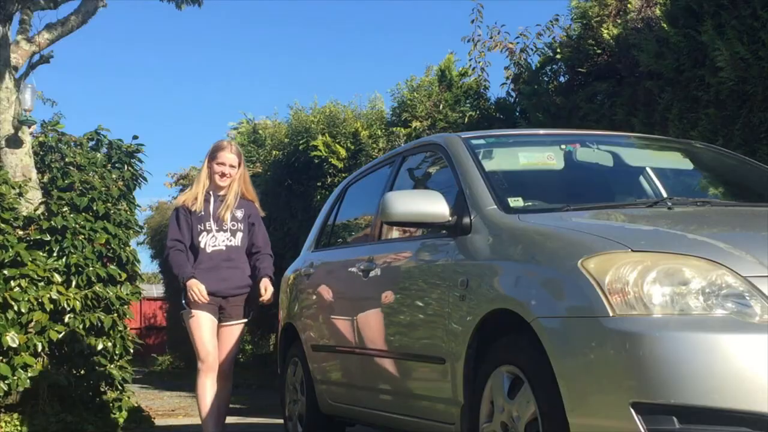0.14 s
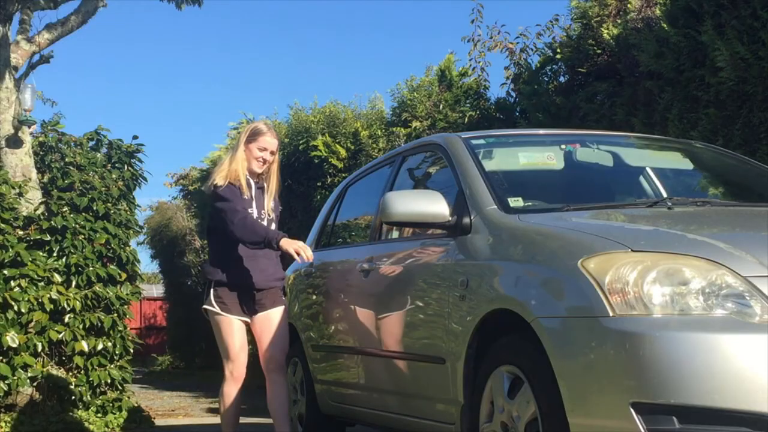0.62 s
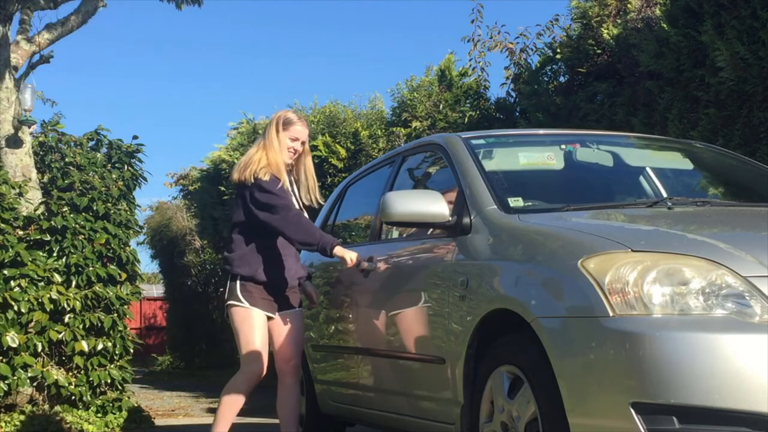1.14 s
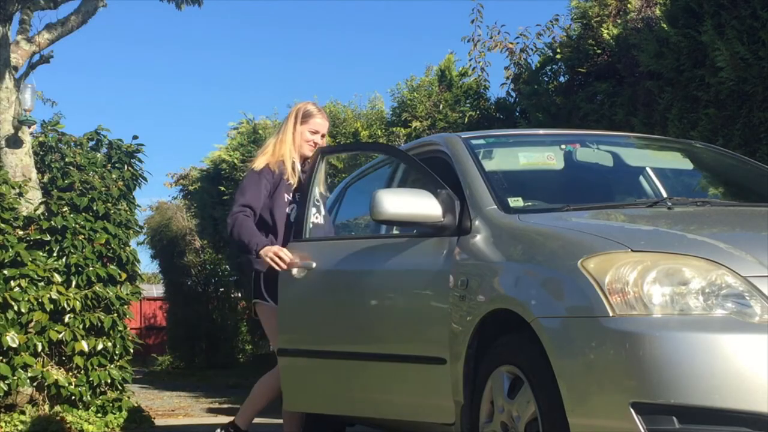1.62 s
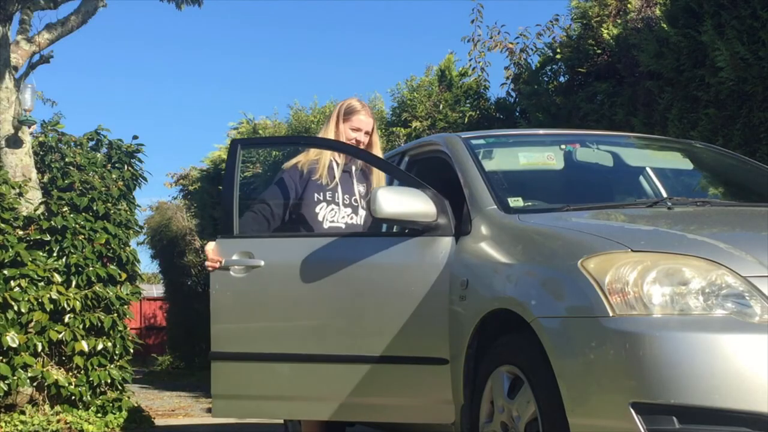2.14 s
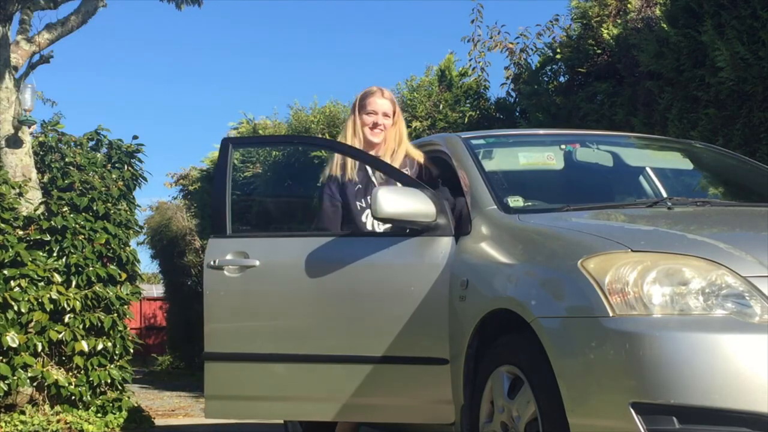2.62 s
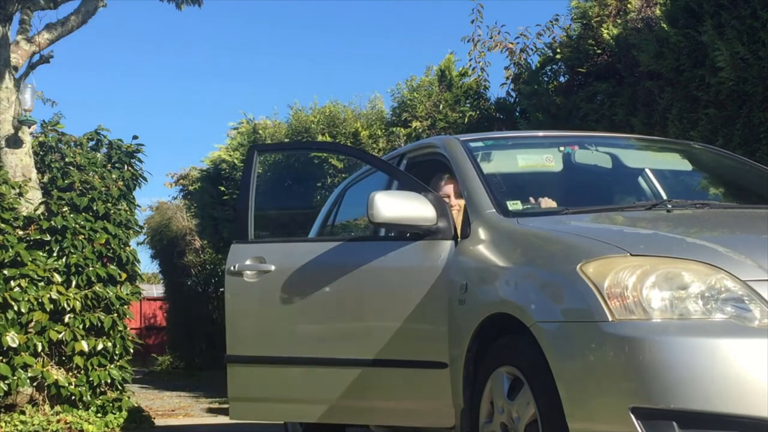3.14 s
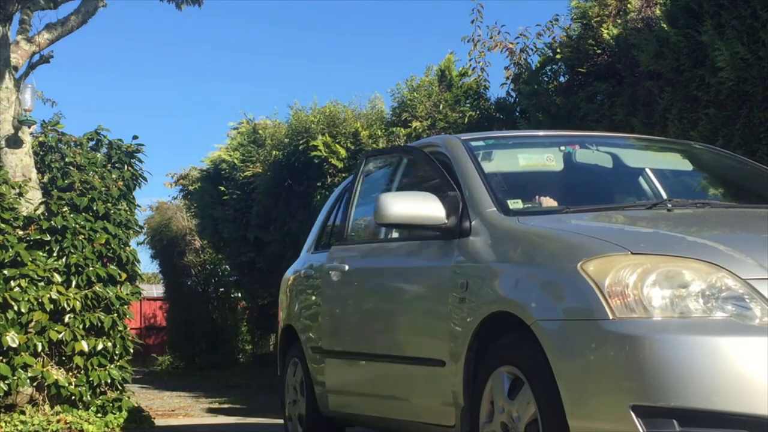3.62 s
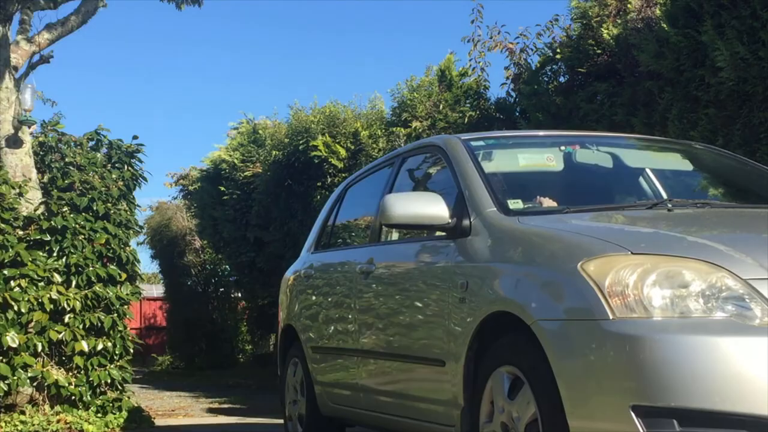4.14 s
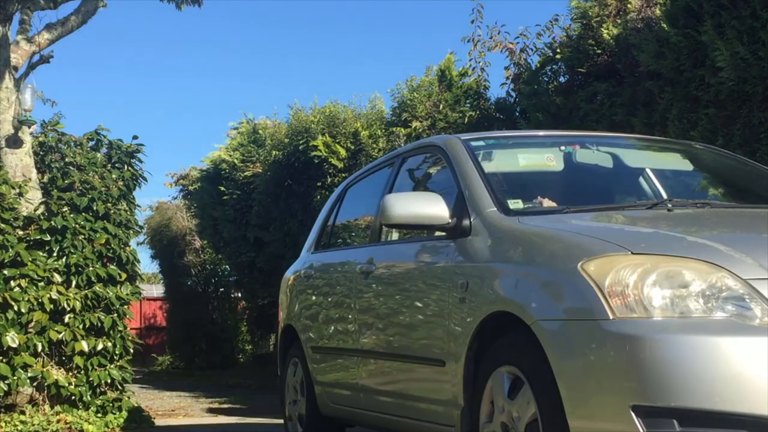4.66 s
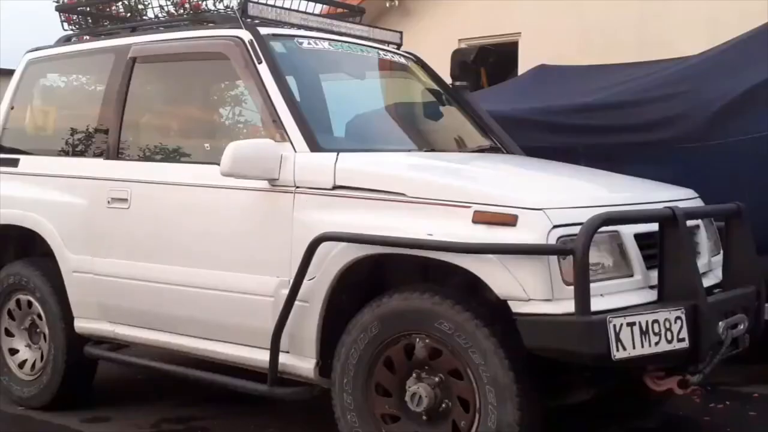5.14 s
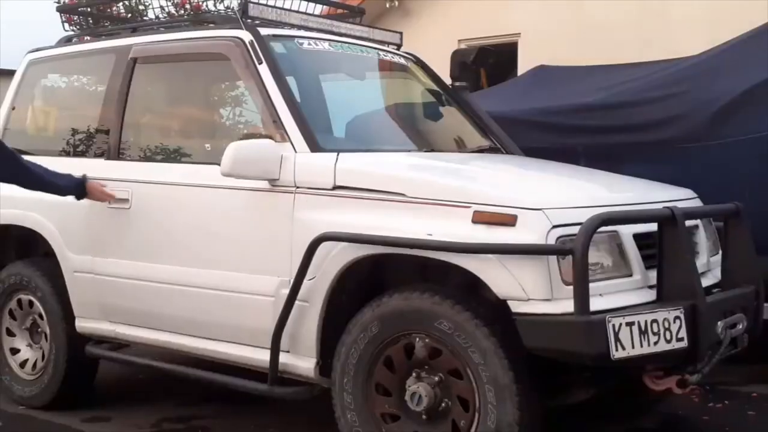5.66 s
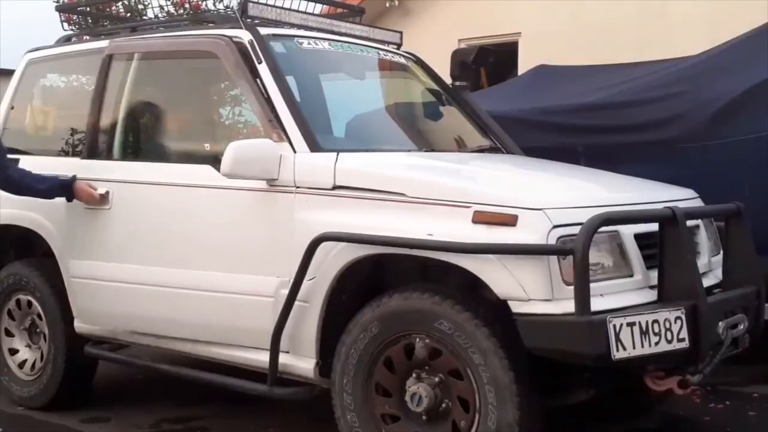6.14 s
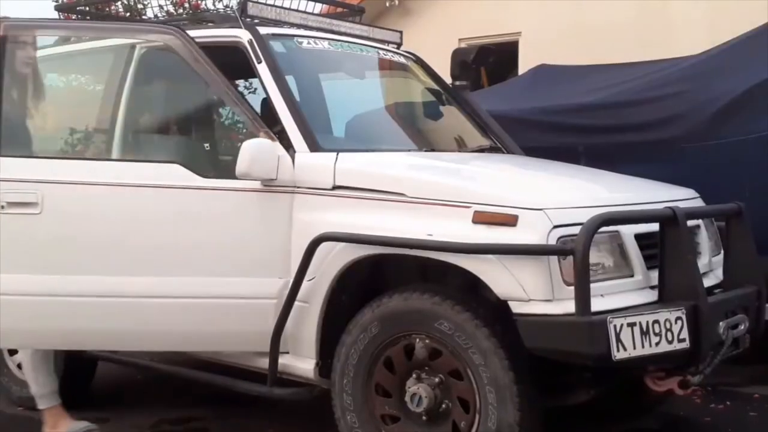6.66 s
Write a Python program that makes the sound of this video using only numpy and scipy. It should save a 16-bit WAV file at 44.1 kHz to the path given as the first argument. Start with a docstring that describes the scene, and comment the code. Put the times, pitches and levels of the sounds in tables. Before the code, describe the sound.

A car slam fades, then a hatchback door unlatches, groans open and slams; after a cut, an off-road car's handle is worked until its latch snaps open.

```python
"""A hedged drive, then a yard, with a short silence between. In the drive, alike in both channels, a slam dies away,
then a hatchback door is unlatched, swings with a groan and is slammed; far traffic, low gusts and a bird surround it.
In the yard, in stereo, feet scuff and a hand works an off-road car's handle until its latch springs open, over a hum.
Doors are bursts of noise and fading sines shaped per blow; groan, bird and hum are sines; the rest is shaped noise."""
import sys
import numpy as np
from scipy import signal
from scipy.fft import rfft, irfft, next_fast_len
from scipy.io import wavfile
from scipy.ndimage import uniform_filter1d

SR = 44100
rng = np.random.default_rng(int(sys.argv[2]) if len(sys.argv) > 2 else 0)


def log_audio(samples):
    """Write samples as a 16-bit WAV file to the path given in sys.argv[1]."""
    # one column per channel
    frames = np.atleast_2d(samples).T
    # limit to full scale, then quantise
    limited = np.clip(frames, -1, 1)
    pcm = np.round(limited * 32767).astype(np.int16)
    wavfile.write(sys.argv[1], SR, pcm)


def volts_from_db(level):
    """Convert decibel levels to linear amplitude ratios."""
    exponent = np.asarray(level, float) / 20
    return 10 ** exponent


N = 298821
T = np.arange(N) / SR


def unit(x):
    """Scale to rms 1."""
    return x / np.sqrt(np.mean(x ** 2))


def peak_to(x, db):
    """Scale so that the loudest 10 ms reach db."""
    return x * volts_from_db(db) / np.sqrt(uniform_filter1d(x ** 2, size=441).max() + 1e-30)


def curve(rows, col=1, off=None):
    """Read one column of a table along time; off is the value outside it."""
    rows = np.asarray(rows)
    return np.interp(T, rows[:, 0], rows[:, col], off, off)


def colour(x, points):
    """Make some pitches louder than others, following (frequency [Hz], level [dB]) points."""
    hz, db = np.transpose(points)
    n = next_fast_len(len(x), True)
    f = np.arange(n // 2 + 1) * SR / n + 1
    gain = volts_from_db(np.interp(np.log(f), np.log(hz), db))
    return irfft(rfft(x, n) * gain, n)[:len(x)]


def lumpy(x):
    """Give a noise chance peaks and valleys every 45 Hz, as small modes crowd and thin out."""
    hz = np.arange(45, SR / 2, 45)
    return colour(x, np.c_[hz, 4 * rng.standard_normal(len(hz))])


def walk(rate):
    """Wander at random: levels held 1 / rate s, smoothed twice; spread near 1."""
    k = int(SR / rate)
    steps = np.repeat(rng.standard_normal(N // k + 1), k)
    return 1.32 * uniform_filter1d(uniform_filter1d(steps, k), k)[:N]


def tone(rows, wobble):
    """A near sine along (time [s], frequency [Hz], level [dB]) rows, silent outside them."""
    hz = curve(rows) * (1 + wobble * walk(150))
    gain = uniform_filter1d(volts_from_db(curve(rows, col=2, off=-140)), size=200)
    return np.sqrt(2) * gain * np.sin(2 * np.pi * np.cumsum(hz) / SR)


def scatter(x, db, fade):
    """Hedges and walls add a dense spray of reflections that fades quickly."""
    t = T[:SR // 4]
    spray = rng.standard_normal(len(t)) * np.exp(-t / fade) * (1 - np.exp(-t / .004))
    return x + volts_from_db(db) * signal.fftconvolve(x, spray)[:N]


# limits of the four parts of a door: low and high [Hz] in turn for latch, cabin, panel, tick
PART_LIMITS = [600, 2200, 30, 160, 160, 600, 2200, 15500]


def strike(blows, modes, points, parts, rough_db):
    """Each blow cracks, then rattles on in latch, cabin, panel and trim: strong modes over countless small ones."""
    t, out = T[:int(.6 * SR)], np.zeros((4, N + SR))
    for k, (lo, hi) in enumerate(np.reshape(PART_LIMITS, (4, 2))):
        rise, crack, tail_db, share, modes_db = parts[k]
        onset = 1 - np.exp(-t / rise)
        band = signal.butter(3, [lo, hi], "band", fs=SR, output="sos")
        noise = lumpy(colour(rng.standard_normal(N), points))
        small = np.r_[signal.sosfilt(band, noise), np.zeros(SR)]
        rattle = np.r_[volts_from_db(rough_db * walk(150)), np.zeros(SR)]  # loose parts touch unevenly
        own = [m for m in modes if lo <= m[0] < hi]
        for s, *db, t60 in blows:
            span = slice(int(s * SR), int(s * SR) + len(t))
            tail = volts_from_db(tail_db - 60 * t / max(share * t60, .01))
            shape = onset * (np.exp(-t / crack) + tail) * rattle[span]
            ring = peak_to(small[span] * shape, 0)
            if own:
                hz, g, mode_t60 = np.transpose(own)[:, :, None]
                # seals and hands damp the ring
                fade = 60 * t / np.minimum(np.clip(mode_t60, .01, 1), 1.02 * t60)
                # each blow lands elsewhere, so loudness and pitch differ a little
                spot, drift, start = rng.standard_normal((3, len(own), 1))
                # one push sets off all modes nearly together
                waves = np.sin(2 * np.pi * (hz * (1 + 0.0197 * drift) * t + 0.13 * start))
                strong = np.sum(volts_from_db(g + 1.3 * spot - fade) * waves, axis=0)
                ring = ring + peak_to(strong * onset, modes_db)
            out[k, span] += peak_to(ring, db[k])
        if lo > 100:  # the cabin answers at once, the rest stays in its range
            out[k] = signal.sosfilt(band, out[k])
    return out[:, :N]


def clacks(rows, cycles):
    """A small steel part rings briefly at each contact, fading by 60 dB in a number of cycles."""
    out, t = np.zeros(N), T[:SR // 3]
    for s, db, hz in rows:
        ring = (1 - np.exp(-t / 0.00084)) * volts_from_db(-60 * t * hz / cycles) * np.sin(2 * np.pi * hz * t)
        out[int(s * SR):int(s * SR) + len(t)] += volts_from_db(db) * ring / np.abs(ring).max()
    return out


def burst(s, db, t60, hz):
    """A sudden bright hiss, strongest from hz upwards, that dies fast."""
    hiss = colour(rng.standard_normal(N), [(hz / 2, -30), (hz, 0), (16000, -18)])
    return unit(hiss) * volts_from_db(db - 60 * np.abs(T - s) / t60) * (T > s)


# window glass and trim shiver on after the slam, one list each: (time [s], frequency [Hz], level [dB])
SHIVER_NOTES = [
    [(3.97, 555, -53), (4.08, 562, -55.5), (4.16, 552, -53.5), (4.24, 547, -65)],
    [(4.03, 1800, -63), (4.1, 1800, -62.5), (4.17, 1810, -68), (4.21, 1814, -79)],
]


def shiver():
    """Loose panes buzz unevenly near their own pitch."""
    return sum(tone(rows, 0.03) * volts_from_db(3.2 * walk(70)) for rows in SHIVER_NOTES)


# pushes on the hinge: (start [s], length [s], frequency [Hz], level [dB])
HINGE_GROANS = [(2.243, .16, 196, -55.5), (2.421, 0.15, 195.6, -60.5)]


def groan():
    """The hinge hums on each push, swelling for 40 ms, then sagging in pitch and fading."""
    out = 0
    for s, length, hz, db in HINGE_GROANS:
        rows = [(s, hz, db - 9.0), (s + .04, hz, db), (s + length, hz - 5.56, db - 11)]
        out = out + tone(rows, 0.014)
    return out


# blows on the hatchback: (time [s], latch level [dB], cabin thump level [dB], door panel level [dB],
# tick level [dB], ring t60 [s])
HATCH_HITS = [(0.626, -80, -61, -65, -82, 0.15), (0.925, -77, -59, -83, -86, 0.44),
              (1.151, -48, -63, -43, -71, 0.24), (1.164, -43, -70, -37, -56, 0.12),
              (1.177, -49, -63, -48, -72, 0.16), (1.196, -45.5, -67, -42, -65, 0.17),
              (1.217, -50, -47, -49, -65, 0.47), (1.240, -55, -32.5, -30.5, -68, 0.14),
              (1.252, -41, -41, -38, -67, 0.26), (1.266, -52, -53, -49, -64, 0.24),
              (1.280, -44, -39, -42, -70, 0.33), (1.323, -49.5, -64, -45.5, -71, 0.38),
              (1.368, -59, -66, -60, -75, 0.24), (1.552, -72, -68.5, -45.5, -80, 0.64),
              (1.577, -59, -65, -49, -76, 0.73), (1.597, -56, -67, -54, -66, 0.37),
              (1.615, -41, -50, -32.5, -58, 0.11), (1.632, -53, -49, -36.5, -68, 0.3),
              (1.705, -47.5, -66, -52, -62, 0.21), (1.738, -70, -65, -59.5, -79, 0.21),
              (1.795, -77, -56, -55.5, -90, 0.69), (2.081, -66, -45.5, -79, -84, 0.88),
              (2.793, -81, -53, -73, -90, 0.51), (2.941, -61, -54.5, -59, -63, 1),
              (3.279, -33.5, -60, -30.5, -52.5, 0.3), (3.289, -44, -38.5, -39, -48.5, 0.57),
              (3.878, -36.5, -53.5, -33, -52.5, 0.71), (3.895, -49, -58, -49.5, -52, 0.13),
              (3.900, -27.5, -23.5, -22.5, -41.5, 0.12), (3.917, -29.5, -27.5, -38.5, -48, 0.14),
              (3.939, -46, -35.5, -31, -52, 0.56), (3.96, -48.5, -33, -55, -59, 0.69),
              (4.03, -48.5, -39, -44, -67, 0.52), (4.117, -55, -68, -47.5, -69.5, 1),
              (4.514, -64, -62, -77, -58, 0.092)]
# strong modes of its body: (frequency [Hz], level [dB], t60 [s])
HATCH_RINGS = [(56.8, -2.5, 0.23), (86.7, 2.5, 0.091), (141.5, -1.5, 0.73), (182.5, -3, 0.28),
               (241, -3.5, 0.45), (285.5, -8, 0.26), (406, -6, 0.16), (431, -15, 0.76), (556, -18.5, 0.8),
               (759, -19, 0.11), (806, -21, 0.91), (929, -22, 0.51), (978, -22.5, 0.22), (1221, -13, 0.058),
               (1490, -11, 0.038), (1598, -9.5, 0.042), (1732, -14.5, 0.031), (1863, -28, .55),
               (2506, -40, 0.095), (2944, -35, 0.062), (3490, -32, 0.033), (4520, -38.5, 0.026),
               (5120, -41, 0.033)]
# its dense small modes: (frequency [Hz], level [dB])
HATCH_SPECTRUM = [(20, -42.5), (40, -4.5), (100, 1.5), (260, -4), (410, -6.5), (520, -9), (1000, -7),
                  (1900, -16), (2150, -22), (3100, -36.5), (3800, -47.5), (5400, -53.5), (5900, -60.5),
                  (8000, -59.5), (15000, -93)]
# latch, cabin, panel, tick: (rise [s], crack [s], tail level against the crack [dB],
# share of the ring time, strong modes level [dB])
HATCH_SHAPES = [(0.0011, 0.0016, -4.5, 0.52, 0), (0.0032, 0.034, 0, 0.45, 0),
                (0.00086, 0.0065, -13.5, 1.05, -0.5), (0.0056, 0.022, -2, 0.94, -9.5)]
# bare metal clacks of the latch: (time [s], peak level [dB], frequency [Hz])
HATCH_METAL = [(.63, -53, 1710), (.93, -52.5, 1710), (1.163, -29.5, 1680), (1.164, -35, 1290),
               (1.217, -38, 1700), (1.222, -38, 1040), (1.247, -37, 1380), (1.252, -30.5, 500),
               (1.323, -44, 1400), (1.616, -27.5, 1600), (1.617, -31, 1204), (1.617, -56, 3720),
               (1.619, -60, 3070), (1.712, -46, 1740), (1.74, -46.5, 950), (3.279, -27, 944),
               (3.28, -58, 3500), (3.285, -28, 1630), (3.878, -40, 825), (3.88, -60, 3500),
               (3.881, -37, 1690), (3.88, -61.5, 4700), (3.915, -28.5, 1660), (3.902, -47.5, 5120),
               (3.905, -47.5, 3490), (3.908, -47.5, 4520), (3.912, -48.5, 4990), (3.921, -34.5, 1260),
               (3.9, -29.5, 964), (4.514, -49, 1840)]
# air and grit forced out as the door meets its seal: (time [s], level [dB], t60 [s], above frequency [Hz])
SEAL_AIR = (3.901, -65, .12, 7000)


def hatch_door():
    """The hatchback door: struck body, ringing metal, seal hiss and shivering panes, plus the hinge."""
    body = strike(HATCH_HITS, HATCH_RINGS, HATCH_SPECTRUM, HATCH_SHAPES, rough_db=1.2).sum(axis=0)
    door = body + clacks(HATCH_METAL, cycles=27) + burst(*SEAL_AIR) + shiver()
    door = scatter(door, db=-37, fade=.03) + groan()
    return signal.sosfilt(signal.butter(3, 40, "high", fs=SR, output="sos"), door)


# blows on the off-road car: (time [s], latch level [dB], cabin thump level [dB], door panel level [dB],
# tick level [dB], ring t60 [s]); the levels are those before the left and right balance
OFFROAD_HITS = [(5.266, -61.5, -66.5, -63.5, -67, 0.81), (5.643, -69.5, -73, -75, -70, 0.12),
                (5.685, -71, -80, -63.5, -78, 0.24), (5.748, -54, -65, -42, -69, 0.19),
                (5.773, -57, -53, -48, -57, 0.3), (5.803, -60, -49.5, -52, -68.5, 0.99),
                (5.896, -71, -51.5, -66, -79, 0.75), (5.912, -60, -69, -73, -68, 0.61),
                (5.929, -56.5, -66, -63, -72, 0.57), (5.981, -48, -62, -45, -72, 0.21),
                (5.992, -60, -43, -46, -77, 0.29), (6.029, -79, -81, -47, -85, 0.23),
                (6.282, -47, -50, -50, -52.5, 1), (6.359, -22, -25, -18, -26.5, 0.15),
                (6.369, -34, -38, -22.5, -42, 0.18), (6.41, -36.5, -35, -28, -42, 0.25),
                (6.435, -42.5, -54, -36.5, -44.5, 0.26), (6.499, -56.5, -54, -44, -60, 0.42),
                (6.742, -58.5, -71, -61, -63, 0.72)]
# strong modes of its body: (frequency [Hz], level [dB], t60 [s])
OFFROAD_RINGS = [(109.5, 0, 0.19), (218.8, 6.5, 0.42), (335.3, 3.5, 0.45), (411.6, -11, 0.51),
                 (621, -6, 0.23), (830, -14, 0.24), (947, -17, 0.35), (1120, -15.5, 0.35),
                 (1350, -12, 0.106), (1600, -9.5, 0.065), (1793, -15, 0.087), (2030, -20, 0.22),
                 (2084, -12.5, 0.041), (2455, -40, 0.2), (3500, -25.5, 0.026), (5100, -25.5, 0.012)]
# its dense small modes: (frequency [Hz], level [dB])
OFFROAD_SPECTRUM = [(69, -35), (101, -21), (256, -12.5), (345, -12), (503, -23), (615, -18), (733, -24),
                    (942, -31), (4460, -36.5), (6500, -41), (9000, -38.5), (10000, -48.5), (16000, -47.5)]
# latch, cabin, panel, tick: (rise [s], crack [s], tail level against the crack [dB],
# share of the ring time, strong modes level [dB])
OFFROAD_SHAPES = [(0.00025, 0.0011, 4, 0.78, -4), (0.013, 0.04, -8, 0.6, 1.5),
                  (0.00059, 0.0047, 0.5, 1.16, 3), (0.00071, 0.0026, -10.5, 0.83, -5.5)]
# left against right for latch, cabin, panel, tick: (level [dB], lag [ms], unrelated share [0-1])
OFFROAD_STEREO = [(-1.5, 0.013, 0.93), (-2, -.2, 0.03), (-3.5, -.2, 0.2), (-0.5, -.2, 0.99)]
# metal clacks of latch and handle: (time [s], peak level before the balance [dB], frequency [Hz])
OFFROAD_METAL = [(5.31, -56.5, 1527), (5.644, -69, 2200), (5.686, -65, 877), (5.748, -55, 1570),
                 (5.749, -62, 2180), (5.803, -57, 1710), (5.907, -63, 814), (5.915, -60, 990),
                 (5.932, -61, 1026), (5.749, -51, 7600), (5.929, -63, 3900), (5.937, -59, 3800),
                 (5.932, -61, 5600), (5.934, -54.5, 1490), (5.99, -52, 1460), (6.03, -55, 610),
                 (6.284, -49.5, 7860), (6.348, -46, 2840), (6.359, -26.5, 5100), (6.361, -33.5, 3500),
                 (6.36, -29, 8460), (6.36, -41, 13800), (6.413, -51, 5040), (6.437, -47.5, 5830)]
# grit and fingernails click: (time [s], level before the balance [dB], t60 [s], above frequency [Hz])
CLICKS = [(5.203, -74, 0.02, 7020), (5.249, -72, .02, 6460), (5.267, -63, 0.027, 7040),
          (5.642, -52, 0.023, 6900), (5.749, -56.5, .03, 4000), (5.772, -57.5, .04, 3600)]


def offroad_handle():
    """The off-road door; the left side hears it weaker, mostly a little sooner and partly by another path."""
    near, other = (strike(OFFROAD_HITS, OFFROAD_RINGS, OFFROAD_SPECTRUM, OFFROAD_SHAPES, rough_db=1.5)
                   for _ in range(2))
    out = np.zeros((2, N))
    for a, b, (db, lag_ms, share) in zip(near, other, OFFROAD_STEREO):
        share = np.clip(share, 0, 1)
        shifted = np.roll(a, int(lag_ms * SR / 1000))
        left = np.sqrt(1 - share) * shifted + np.sqrt(share) * b
        out += [volts_from_db(db / 2) * left, volts_from_db(-db / 2) * a]
    steel = clacks(OFFROAD_METAL, cycles=65) + sum(burst(*row) for row in CLICKS)
    out += [volts_from_db(-3.5) * np.roll(steel, -8), volts_from_db(7.5) * steel]  # left is 8 samples sooner
    out[0] = colour(out[0], [(8000, -4.5), (13000, 0.5)])  # the left is held back below the top treble
    out = [scatter(v, db=-41, fade=.03) for v in out]
    return signal.sosfilt(signal.butter(6, 85, "high", fs=SR, output="sos"), out)


# spectrum of the scuffs: (frequency [Hz], relative level [dB])
SCUFF_SPECTRUM = [(410, -26), (700, -13), (971, -9), (1110, -5), (1970, -13), (2600, -14.5), (3150, -17),
                  (3690, -14), (5540, -17), (8880, -13.5), (9860, -28), (13300, -25.5), (16000, -42)]
# left minus right: (frequency [Hz], level [dB])
SCUFF_STEREO = [(60, -10), (110, -9), (200, -13.5), (380, -16), (700, -8), (1290, -14.5), (2380, -4),
                (4400, -7.5), (8120, -7), (15000, 3)]
# feet and sleeve: (time [s], level before the lift [dB], hold [s], fade t60 [s])
SCUFF_MOVES = [(5.267, -61.5, 0.077, 0.28), (5.654, -71.5, 0.075, .3), (5.751, -57.5, 0, .2),
               (5.776, -59.5, 0.0049, 0.32), (5.933, -70, 0.0076, .16), (5.99, -55.5, 0.0062, 0.061),
               (6.008, -71, .05, 0.28), (6.085, -72, 0.034, .2), (6.287, -60, 0.012, 0.14),
               (6.361, -60, 0.0061, 0.37), (6.717, -65.5, 0.018, 0.38)]


def scuffs():
    """Feet and sleeve: gritty noise, unrelated left and right, with a quick rise, a hold and a fade."""
    lift_db, rise_s, rest_db = 3.5, 0.067, -83  # rise over 60 dB; a faint rustle rests between
    power = volts_from_db(rest_db) ** 2
    for s, db, hold, t60 in SCUFF_MOVES:
        fall = np.maximum((s - T) / rise_s, np.maximum(T - s - hold, 0) / t60)
        power = power + volts_from_db(db + lift_db - 60 * fall) ** 2
    grit = rng.standard_normal((2, N)) * volts_from_db(1.2 * rng.standard_normal(N) + 1.0 * walk(60))
    out = np.array([unit(lumpy(colour(g, SCUFF_SPECTRUM))) for g in grit]) * np.sqrt(power)
    out[0] = colour(out[0], SCUFF_STEREO)
    return out


# an earlier slam dying away: (time [s], boom level [dB], rattle level [dB])
SLAM_FADE = [(0.0, -39, -38.5), (0.016, -30.5, -36.5), (0.084, -36.5, -45), (0.106, -36, -39),
             (0.13, -36, -43.5), (0.17, -41.5, -50), (0.25, -46.5, -65), (0.32, -43.5, -73),
             (0.402, -49, -81), (0.48, -72, -73)]
# its spectrum: (frequency [Hz], relative level [dB])
SLAM_SPECTRUM = [(15, -37), (25, -11.5), (104, -4), (192, -10), (256, -18), (513, -13.5), (555, -15.5),
                 (682, -16), (2180, -15.5), (3130, -20), (3850, -31.5), (6290, -38), (12000, -61),
                 (15600, -100)]


def slam_tail():
    """Boom and rattle of panels that were struck just before: noise split at 250 Hz, each half fading."""
    sound = colour(rng.standard_normal(N), SLAM_SPECTRUM)
    boom, rattle = (unit(signal.sosfilt(signal.butter(3, 250, kind, fs=SR, output="sos"), sound))
                    for kind in ("low", "high"))
    rattle = rattle * volts_from_db(1.1 * walk(59))
    dull = signal.sosfilt(signal.butter(2, 1800, fs=SR, output="sos"), rattle)
    rattle = dull + (rattle - dull) * np.exp(-T / 0.33)  # the treble dies first
    return boom * volts_from_db(curve(SLAM_FADE, off=-120)) + rattle * volts_from_db(curve(SLAM_FADE, col=2, off=-120))


# chirps: (time [s], top of the fall [Hz], level [dB])
BIRD_CHIRPS = [(3.186, 6480, -59), (3.388, 6530, -58.5)]
# upward flick: (time after the start [s], frequency [Hz], level [dB])
FLICK = [(-.001, 5000, -14), (.002, 5400, -4), (.005, 5850, -7), (.008, 6100, -18)]
# fall: (time after the start [s], share of the fall left, level [dB])
FALL = [(.003, 1, -20), (.008, .97, -12), (.014, .9, -9), (.021, .6, -2), (.028, .3, -4), (.035, .1, 2),
        (.043, 0, -1), (.05, 0, -20)]
# second voice at the end: (time after the start [s], frequency [Hz], level [dB])
FORK = [(.032, 4500, -20), (.037, 4700, -5), (.043, 4650, -4), (.049, 4400, -20)]
# before and over the second chirp: a faint rising lead-in, a short high note, a short middle note,
# one list each: (time [s], frequency [Hz], level [dB])
EXTRA_NOTES = [
    [(3.355, 4800, -82), (3.37, 5250, -71), (3.384, 6000, -80)],
    [(3.378, 7100, -80), (3.391, 7050, -76), (3.398, 6950, -64), (3.405, 6900, -72)],
    [(3.396, 5300, -76), (3.4, 5100, -65), (3.405, 4900, -76)],
]


def bird():
    """Each chirp is an upward flick, then a fall that forks at its end; husky, smeared by the hedges."""
    end_hz = 4170
    song = sum(tone(rows, .012) for rows in EXTRA_NOTES)
    for s, top_hz, db in BIRD_CHIRPS:
        fall = [(s + a, end_hz + left * (top_hz - end_hz), db + g) for a, left, g in FALL]
        song = song + tone(fall, 0.012)
        for rows in (FLICK, FORK):
            song = song + tone(np.add(rows, (s, 0, db)), 0.0085)
    song = song * (1 + .25 * walk(500) + .4 * walk(2200))  # huskiness
    return scatter(song, db=-31, fade=.055)


# spectrum of the wind: (frequency [Hz], relative level [dB])
GUST_SPECTRUM = [(12, -49.5), (20, -7.5), (59, 4), (130, 7.5), (166, -12.5), (200, -6.5), (226, -19),
                 (300, -15.5), (390, -60)]
# its strength: (time [s], level [dB])
GUST_LEVELS = [(.45, -58), (.99, -64.5), (1.45, -57.5), (1.95, -63.5), (2.1, -56), (2.3, -60.5), (2.6, -67),
               (2.82, -56), (3.25, -56.5), (3.6, -60), (3.85, -55), (4.2, -54.5), (4.35, -55),
               (4.55, -56.5), (4.98, -65.5)]


def gusts():
    """Low wind noise that comes in uneven puffs, about 24 a second."""
    return unit(colour(rng.standard_normal(N), GUST_SPECTRUM)) * volts_from_db(curve(GUST_LEVELS) + 4 * walk(24))


# spectrum of the far traffic: (frequency [Hz], relative level [dB])
TRAFFIC_SPECTRUM = [(88, -35.5), (150, -12), (162, -21.5), (201, -15), (226, -9), (280, -8), (303, -12),
                    (368, -11), (484, -14), (941, -5.5), (1530, -15), (3100, -15.5), (4080, -25),
                    (13200, -32.5), (16000, -38)]


def traffic():
    """Far traffic: a steady shaped noise whose level hardly wanders."""
    return unit(colour(rng.standard_normal(N), TRAFFIC_SPECTRUM)) * volts_from_db(-63.5 + 0.17 * walk(4.9))


def machine_hum():
    """A machine hums: one sine near 102 Hz, slightly unsteady in pitch and level."""
    phase = 2 * np.pi * np.cumsum(102.3 * (1 + 0.0013 * walk(22))) / SR
    return np.sqrt(2) * volts_from_db(-57.5 + 1.1 * walk(8.9)) * np.sin(phase)


# spectrum of the yard air: (frequency [Hz], relative level [dB])
AIR_SPECTRUM = [(40, -4), (70, 12), (140, 6), (200, -1.5), (330, 2), (500, -4.5), (700, -3.5), (950, -2),
                (1300, -18), (2400, -27), (5000, -34), (8700, -22), (11000, -30.5), (16000, -28)]


def yard_air():
    """The air of the yard: noise whose bass is shared left and right and whose treble is not."""
    noise = rng.standard_normal((2, N))
    shared = colour(noise[1], [(100, 4.5), (300, 3.5), (900, -26.5)])
    alone = colour(noise[0], [(100, -26), (300, 0.0), (900, 4.5)])
    sides = (shared + alone, noise[1])
    return np.array([unit(colour(v, AIR_SPECTRUM)) * volts_from_db(-63.5 + 0.43 * walk(7.2)) for v in sides])


def drive():
    """The hatchback and its surroundings, as one channel, stopping at 4.989 s."""
    return (hatch_door() + slam_tail() + bird() + gusts() + traffic()) * (T < 4.989)


# hum and air, left minus right: (frequency [Hz], level [dB])
YARD_STEREO = [(60, -14.5), (110, -14.5), (200, -13.5), (380, -12.5), (700, -11.5), (1290, -9.5),
               (2380, -3.5), (4400, -3.5), (8120, -5.5), (15000, -2.0)]


def yard():
    """The handle and scuffs over hum and air that lie mostly on the right, rising from 5.028 s within 13 ms."""
    background = yard_air() + machine_hum()
    background[0] = colour(background[0], YARD_STEREO)
    return (offroad_handle() + scuffs() + background) * np.clip((T - 5.028) / 0.013, 0, 1)


def scene():
    """The drive, then the yard."""
    return drive() + yard()


def top_cut(x):
    """Nothing passes above the cut-off."""
    return signal.sosfilt(signal.butter(12, 15900, fs=SR, output="sos"), x)


def record(dry):
    """Both places are passed on as one finished mix."""
    return top_cut(dry)


dry = scene()
out = record(dry)
log_audio(out)
```